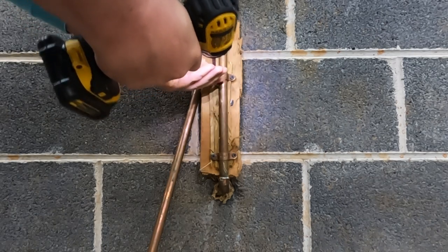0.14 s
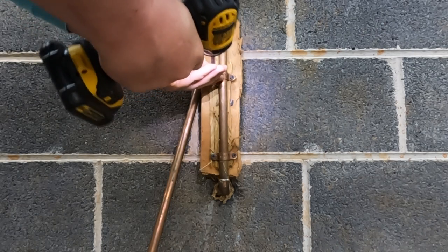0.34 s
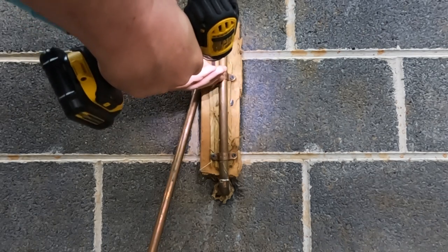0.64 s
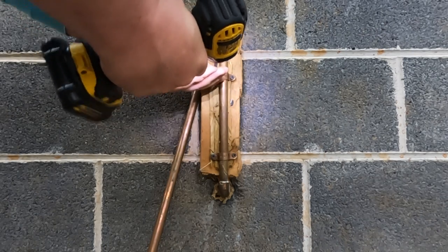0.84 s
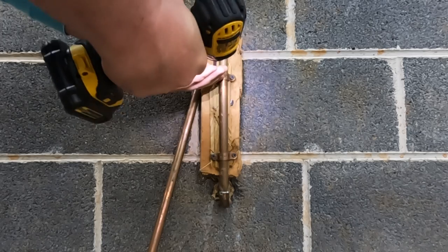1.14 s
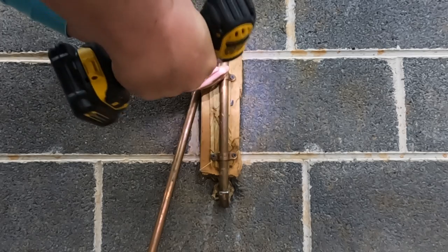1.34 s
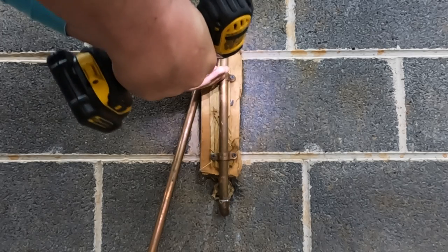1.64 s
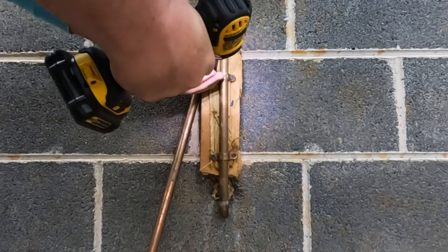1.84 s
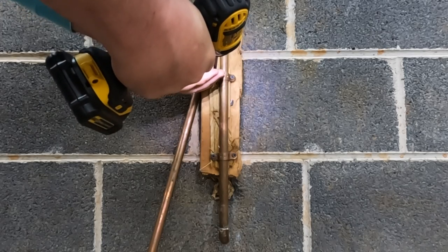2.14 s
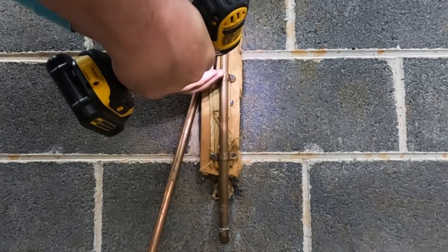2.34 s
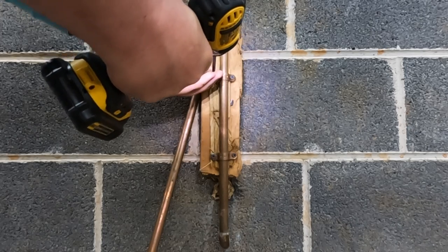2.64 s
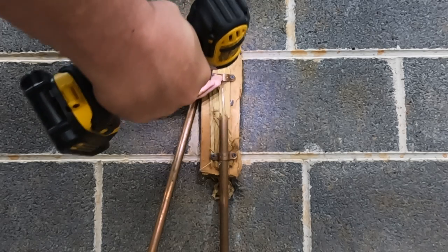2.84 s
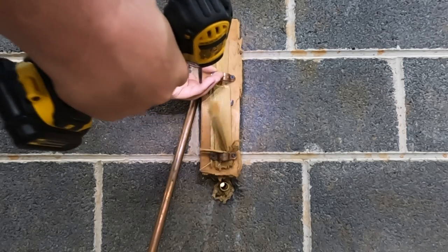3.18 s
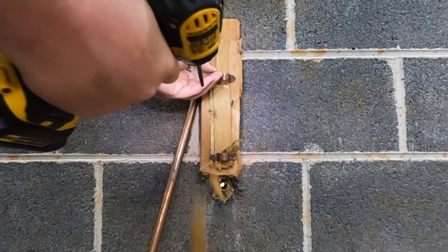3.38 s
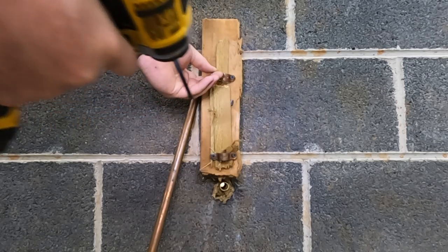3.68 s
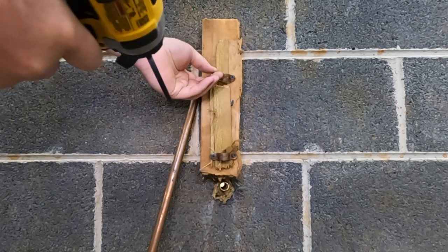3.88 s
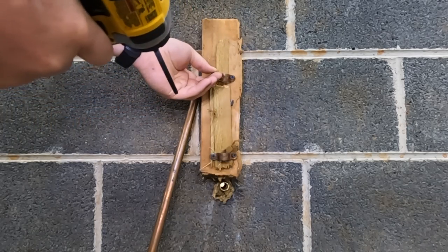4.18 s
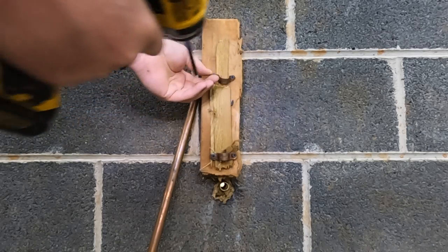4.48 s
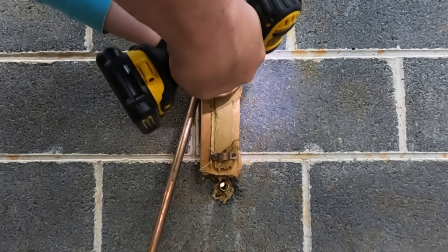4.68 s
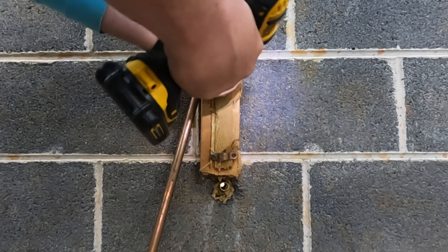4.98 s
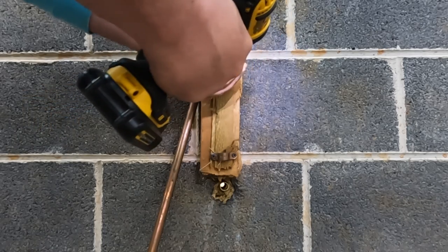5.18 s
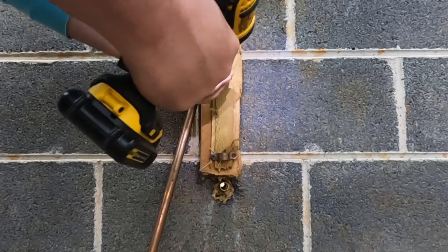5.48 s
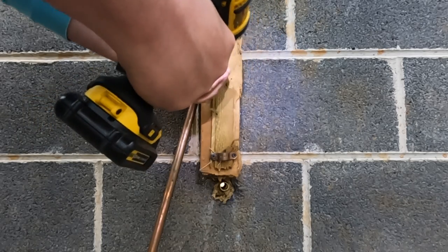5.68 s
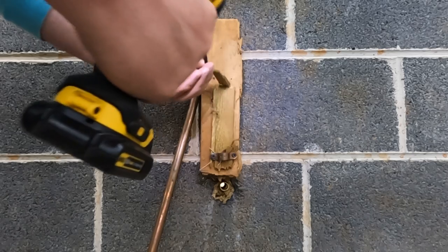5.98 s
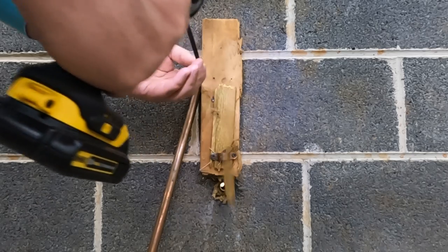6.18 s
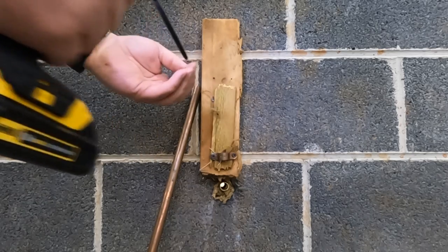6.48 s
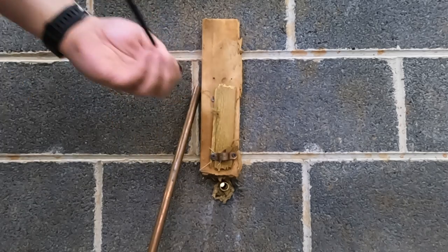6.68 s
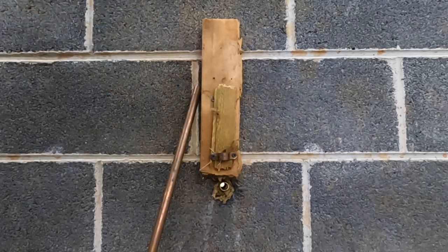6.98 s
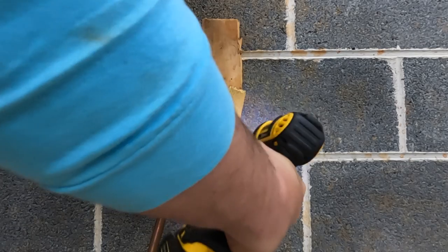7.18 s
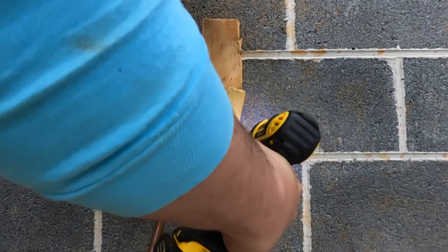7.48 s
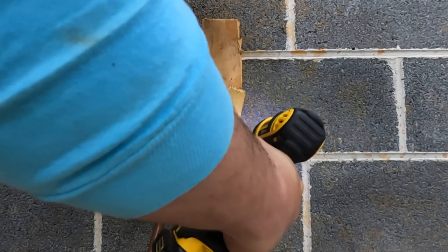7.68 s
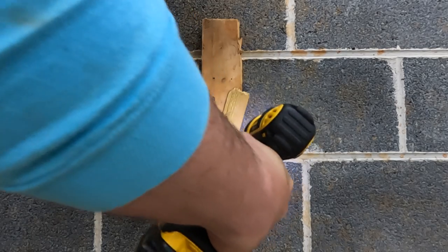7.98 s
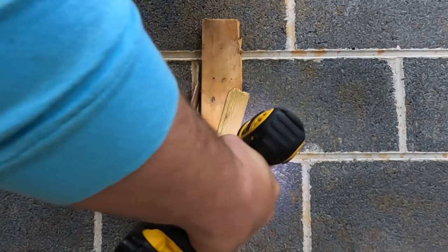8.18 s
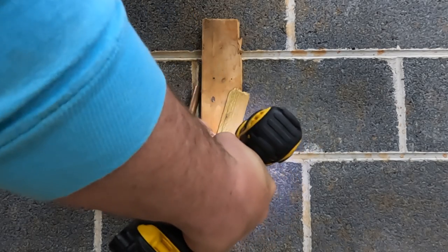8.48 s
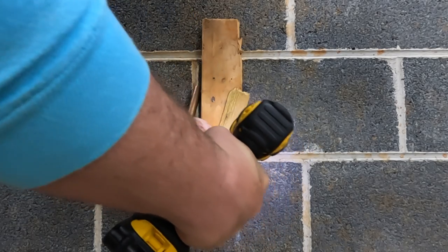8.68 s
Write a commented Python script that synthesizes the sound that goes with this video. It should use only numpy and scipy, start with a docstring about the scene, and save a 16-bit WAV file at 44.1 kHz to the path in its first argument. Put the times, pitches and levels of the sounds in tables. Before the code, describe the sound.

A cordless driver whirrs in short bursts and rattles screws loose, then a copper pipe drops and rings on concrete in a rumbling basement.

```python
"""Cordless driver and falling pipe

A cordless driver backs screws out of a wooden batten on a basement block wall in short pulls of the trigger:
throbbing noise, tooth whine, squeals and knocks. A freed length of copper pipe scrapes out, drops and bounces
ringing on the concrete, its paired modes beating; small parts click in the hand as resonant bursts.
Shaped noise and a wavering sine make a boiler-like rumble with a mains hum under everything."""
import sys
import numpy as np
from scipy import signal
from scipy.fft import rfft, irfft, next_fast_len
from scipy.io import wavfile
from scipy.ndimage import uniform_filter1d

SR = 44100
rng = np.random.default_rng(int(sys.argv[2]) if len(sys.argv) > 2 else 0)


def store_wav(level_fs):
    """Save 16-bit WAV to argv[1]."""
    pcm = np.round(np.clip(np.atleast_2d(level_fs), -1, 1) * 32767)
    wavfile.write(sys.argv[1], SR, pcm.T.astype(np.int16))


N = 389403   # samples

# Levels in the tables are relative: each layer is trimmed again where it is mixed.

# Rumble level over time, sinking from 3.2 s to 4.5 s and jumping back at 4.55 s: [t/s, level/dB]
RUMBLE_LEVEL = [
    [(0.0, -39), (.67, -37), (1.3, -41), (1.75, -38), (3.15, -34.5), (3.85, -43), (4.39, -44.5),
     (4.535, -42), (4.555, -35), (7.3, -34), (7.55, -39.5), (7.9, -36), (8.83, -34)],
]
# Spectrum of the rumble noise: [f/Hz, level/dB per Hz]
RUMBLE_SPECTRUM = [(12, -37.5), (20, -8.5), (48, -10.5), (65, -3), (87, -9), (144, -17.5), (172, -27.5),
                   (236, -29.5), (352, -33), (440, -40), (476, -35.5), (524, -39.5), (900, -63.5),
                   (1170, -91.5), (1980, -120)]
# Spectrum of the thin air noise: [f/Hz, level/dB per Hz]
AIR_SPECTRUM = [(410, -38), (700, -5.5), (1260, 0), (1330, -1), (1450, -3), (2030, -10.5), (2370, -10),
                (3350, -16.5), (6430, -15), (10300, -31.5), (15000, -34.5)]
# Time the room takes to die away by 60 dB: [f/Hz, t60/s]
ROOM_T60 = [(100, 0.69), (1000, 0.46), (4000, 0.37), (8000, 0.19), (14000, 0.45)]
# Treble tilt of the work, given in part to each ear: [f/Hz, level/dB]
EAR_TILT = [(60, 3), (180, 1.5), (550, -2.5), (1650, -4.5), (4970, -3), (15000, 11)]
# Skin and sleeve rustling faintly: [loudest t/s, level/dB, swells 20 dB in t/s, fades 20 dB in t/s]
RUSTLES = [(2.006, -55, .1, .1), (2.294, -76, .15, .25), (5.04, -57, .01, .03), (5.15, -68, .2, .15),
           (5.246, -59, .02, .04), (5.416, -58.5, .14, .11), (5.69, -69, .15, .2), (6.018, -61.5, .11, .16),
           (6.332, -62, .015, .015), (6.52, -56, .02, .15), (6.692, -52, .015, .09), (6.804, -56, .01, .25),
           (8.288, -52, .06, .05), (8.68, -68, .08, .15)]
# Trigger, bit and screws clicking: [t/s, level/dB, ring f/Hz, bright edge level/dB, woody body level/dB]
CLICKS = [(0.181, -37, 3350, -27, -4), (0.216, -33.5, 2660, -31, 1), (0.4294, -43.5, 5450, 5, -12),
          (0.6419, -34, 2230, -30, -14), (0.789, -43, 2640, -32, 1.5), (1.2535, -31.5, 5330, -37, -16.5),
          (1.319, -47, 2670, -28, -4), (1.3839, -33.5, 5160, -13.5, -7), (1.792, -40, 2590, -28, -17),
          (4.4983, -39, 2960, -51, -27), (4.5989, -35, 2650, -44, -3), (4.6124, -44, 2760, -20, -10),
          (4.6776, -31, 3940, -32, -26), (4.9284, -29, 5220, -18, -13.5), (5.0404, -25, 7180, -27, -38),
          (5.0654, -41.5, 3950, -24, -7.5), (5.0956, -32, 3930, -30, -12.5), (5.1079, -26, 3040, -28, -21),
          (5.149, -28, 3060, -21, -17), (5.1791, -41, 3690, -18, -6), (5.208, -30, 3700, -11, -19),
          (5.2244, -39, 4610, -17, -8), (5.2455, -27, 4750, -21.5, -18), (5.9479, -44, 4410, -4, -13),
          (5.9858, -38.5, 4520, -6, -20.5), (6.007, -45, 4500, 0.5, -18.5), (6.0267, -40, 4440, -4, -23.5),
          (6.0644, -49, 4440, -12, -12), (6.1404, -39.5, 3800, 0, -29), (6.332, -44.5, 2730, -22, -12.5),
          (6.4736, -8.5, 4620, -27, -17), (6.4994, -8, 4520, -12.5, -12.5), (6.619, -27, 4470, -12, -22),
          (6.695, -21, 6500, -16, -20), (6.7387, -30, 4700, 0, -17), (6.804, -22.5, 6450, -6.5, -27),
          (6.9438, -24.5, 4420, -11.5, -14), (7.0485, -36.5, 2290, -25, -9),
          (7.1204, -39, 2230, -24.5, -15.5), (7.1478, -64, 2720, 3.5, 9), (7.1808, -21, 4210, -14, -8),
          (7.5353, -32, 2500, -36, -7), (7.5854, -30.5, 2670, -29, -7), (7.6113, -9, 4300, -32, -14.5),
          (7.8449, -30, 2570, -33, -10), (7.8958, -41, 3710, -27, -4), (8.2516, -30.5, 2480, -31, -12),
          (8.2641, -33.5, 5950, -32, -11), (8.317, -16, 3930, -15, -30), (8.4442, -6.5, 5800, -15, -25.5),
          (8.5344, -19.5, 4475, -23, -21.5), (8.7869, -43.5, 2240, -24, -9)]
# Ringing modes of a screw: [f/Hz, level/dB, t60/s]
SCREW_MODES = [(3680, -11, 0.047), (4430, -14, .2), (4460, -7, .15), (6120, -5, 0.055), (7400, -7, .06),
               (10200, -9.5, .08)]
# Pipe scraping along its clips, one list per scrape: [t/s, rasp level/dB, fine hiss level/dB]
SCRAPES = [
    [(1.9, -83, -81), (1.945, -50, -57), (2.004, -49, -51.5), (2.042, -44, -64), (2.07, -66, -73),
     (2.12, -76.5, -78.5)],
    [(2.63, -64, -79), (2.672, -56, -76), (2.678, -45, -77), (2.72, -55, -70), (2.76, -41, -57),
     (2.91, -42, -48), (2.924, -31, -47), (2.94, -39, -49), (2.952, -30, -48), (2.975, -38, -46),
     (3.022, -28, -40), (3.076, -45, -43.5), (3.128, -37, -34), (3.14, -43, -41), (3.19, -50, -48),
     (3.26, -51.5, -55)],
]
# Resonances of clips and batten: [f/Hz, width f/Hz, level/dB]
RASP_BANDS = [(1420, 300, 3.5), (2300, 300, 1), (2830, 170, 0), (300, 470, -0.5)]
# Spectrum of the fine hiss: [f/Hz, level/dB per Hz]
HISS_SPECTRUM = [(1940, -26.5), (3300, -6.5), (3920, -8.5), (5440, -10.5), (6790, -0.5), (8980, -11.5),
                 (10800, -9), (13200, -13.5), (15000, -36)]
# Pipe meeting wall and floor; the 24 Hz thud at 3.696 s is a sub-bass jolt apart from the pipe:
# [t/s, crack level/dB, thud level/dB, thud f/Hz, thud t60/s]
BOUNCES = [(3.103, -25, -32, 120, 0.11), (3.123, -7, -30, 122, 0.089), (3.287, 1.5, -5.5, 108, 0.04),
           (3.489, -8.5, -24, 158, 0.063), (3.613, -22.5, -40, 100, 0.093), (3.696, -9, -10.5, 24, 0.23),
           (3.71, -10.5, -8, 177, 0.023), (3.909, -18, -21, 60, 0.038), (4.021, -17, -46, 90, .08),
           (4.098, -24, -40.5, 90, .08)]
# Pipe modes, balanced within each family: [f/Hz, level/dB]
PIPE_MODES = [(436.0, -31), (1222, -31), (1270, -42), (2326, -27), (2724, -42), (3472, -34), (4027, -34),
              (4296, -37), (5190, -41), (5480, -35), (6040, -40), (6218, -51), (6395, -51), (6616, -50),
              (6697, -47), (7144, -49), (7424, -45), (7752, -51), (8457, -56), (8839, -56), (9205, -65),
              (9415, -52), (9631, -53), (10347, -50), (10664, -59), (11063, -61), (11590, -67),
              (12748, -59), (13657, -66), (14137, -75)]
# Harder landings set the modes ringing afresh: [t/s, beats of the lowest mode/per s as the pipe turns over,
# their phase at the landing/rad, pace of the beating above it/ratio, then level/dB of each family in turn]
LANDINGS = [(3.123, 5.1, .1, 1.01, -60, -61, -46, -65, -48, -51, -50, -47, -61),
            (3.287, 5.5, -.2, 1.03, -29, -38, -21, -47, -26, -34, -20, -39, -41),
            (3.489, 4.1, 1.1, .85, -32, -29, -23, -45, -23, -23, -23, -35, -40),
            (3.613, 2.1, 1.9, .7, -32, -22, -20, -46, -33, -22, -35, -45, -54),
            (3.696, 2.1, 2.6, .97, -28, -36, -21, -41, -32, -27, -28, -27, -28),
            (3.909, 2.1, -3.1, 1.1, -25, -42, -33, -36, -37, -24, -23, -27, -38),
            (4.021, 6.1, -1.4, .8, -31, -41, -31, -34, -40, -29, -26, -30, -35)]
# Mode families; the tube is not quite round, so each mode has a twin: [top f/Hz, decay/dB per s,
# extra decay when rolling/dB per s, beats/per s, twin share/ratio, twin phase at the landing/rad]
FAMILIES = [(600, 5, 40, 0, .45, 0), (1500, 5, 12, 4.1, .3, -2.1), (2500, 22, 35, 14, .45, 2.1),
            (3000, 5, 100, 9.1, .4, -2.1), (3800, 60, 90, 8.1, .35, .3), (4800, 35, 130, 13, .5, -1.5),
            (5800, 60, 50, 9.1, .55, .3), (8000, 45, 60, 8.1, .55, -.5), (16000, 90, 90, 8.1, .55, -.5)]
# Pipe chattering on the concrete: [t/s, depth/0-1]
CHATTER = [
    [(3.29, .03), (3.69, .03), (3.7, .3), (3.73, .04), (3.9, .06), (4.02, .12), (4.1, .22), (4.22, .18),
     (4.5, .05)],
]
# Tight screws squealing as they break loose: [start t/s, end t/s, from f/Hz, to f/Hz, level/dB]
SQUEALS = [(0.863, 0.88, 2745, 3245, -12.5), (.864, .875, 4030, 4120, -14), (.865, .876, 1080, 1050, -23.5),
           (.878, 0.882, 1870, 2270, -13.5), (0.88, 0.895, 2890, 4130, -13),
           (7.199, 7.213, 1102, 1700, -20.5), (7.2, 7.228, 4090, 4790, -11),
           (7.209, 7.229, 2300, 2530, -12.5), (7.228, 7.249, 4500, 4490, -17),
           (5.55, 5.68, 2900, 2600, -68), (7.229, 7.243, 2900, 3380, -15.5)]
# Hammer blows of the driver: [t/s, steel level/dB, ring f/Hz, thud level/dB]
BLOWS = [(0.931, -11.5, 1380, -28), (0.951, -11.5, 2970, -22.5), (0.959, -11, 2980, -15.5),
         (0.983, -5.5, 3110, -17.5), (1.009, -11, 1096, -22), (7.299, -9, 1490, -22),
         (7.31, -11, 1660, -14), (7.321, -9, 2510, -14), (7.334, -13, 2610, -14)]
# Trigger pulls: [squeezed t/s, let go t/s, tooth rate it climbs towards f/Hz, motor level/dB,
# whine level/dB, housing rattle level/dB, batten jolt level/dB, jolt lasts t/s]
PULLS = [(-.15, .005, 2000, -31, -60, -36, -40, .02), (.228, .342, 2250, -21, -25, -27, -27, .01),
         (.858, .882, 1900, -15, -45, -30, -38, .01), (.885, .99, 1800, -26, -45, -38, -28, .07),
         (1.394, 1.52, 2050, -21.5, -25, -20, -41, .03), (4.672, 4.817, 1750, -21.5, -24, -21, -42, .03),
         (7.18, 7.212, 1800, -15, -55, -28, -46, .01), (7.23, 7.335, 1800, -21, -55, -34, -25, .07),
         (7.602, 7.692, 1850, -21.5, -26, -29, -31, .05), (7.907, 8.003, 2100, -21.5, -25, -23, -42, .03),
         (8.313, 8.44, 2100, -19.5, -24, -24, -44, .02)]
# Spectrum of brush and gear noise: [f/Hz, level/dB per Hz]
MOTOR_SPECTRUM = [(180, -58.5), (300, -19.5), (509, -13.5), (1110, -7), (1220, -5.5), (1420, -4.5),
                  (2250, -5.5), (2610, -2), (3570, -5), (5130, -3), (7500, -10.5), (11900, -24.5),
                  (15500, -39.5)]
# Housing resonances lifting the whine overtones: [f/Hz, width f/Hz, level/dB]
HOUSING_BANDS = [(2600, 600, -1.5), (5300, 450, -3.5)]

AIR_DB, AIR_FOLLOWS = -65.5, .9   # base level at the loudest rumble; share of the rumble's sag
# The far room lingers after loud work: dB against the work, time constant of the power in s
MID_LINGER_DB, MID_LINGER_S = -28, .06
TREBLE_LINGER_DB, TREBLE_LINGER_S = -32, .035
CONTACT_S = .005   # a landing lasts
ROLLS_S = 4.1   # the pipe stops bouncing
FADE_FROM_S, FADE_DB_PER_S2, FADE_MOST_DB = 4.29, 5000, 44   # the ring is faded out ever faster
SPIN_UP_S, BRAKE_HZ_PER_S = .04, 29000
MOTOR_SLOPE, RATTLE_SLOPE = .85, 1.3   # dB of level per dB of speed
COAST_S, MOTOR_FALL_DB_PER_S, RATTLE_FALL_DB_PER_S = .008, 420, 480   # after the trigger is let go
JOLT_RISE_DB_PER_S, JOLT_FALL_DB_PER_S = 300, 190   # the brake kicks the batten
LIGHT_LOAD_DB, BRAKING_DB = -11.5, -1.5   # the teeth sing less at full speed, when torque is low
WHINE_SLOPE, WHINE_KNEE_HZ = 4.5, 1000   # the small housing radiates little below the knee
CUTOFF_HZ = 15700


def amp(db):
    """Gain of a level in dB."""
    return 10 ** (np.asarray(db) / 20)


def unit(x):
    """Scale to rms 1."""
    return x / np.sqrt(np.mean(x ** 2) + 1e-20)


def noise():
    """White noise over the whole scene."""
    return rng.standard_normal(N)


def in_time(tables, rest=-120, hold=False):
    """Draw the columns of several curves on the sample grid; between them at rest, or held."""
    t = np.arange(N) / SR
    out = np.full((len(tables[0][0]) - 1, N), float(rest))
    for rows in tables:
        s, *columns = np.transpose(rows)
        on = (t >= s[0]) & (hold | (t <= s[-1]))
        out[:, on] = [np.interp(t[on], s, column) for column in columns]
    return out


def on_samples(coarse):
    """Bring rows given every millisecond onto the sample grid."""
    t = np.arange(N) / SR
    return [np.interp(t, np.arange(len(row)) / 1000, row) for row in coarse]


def at_hz(points, hz):
    """Read a spectrum on a log frequency axis."""
    table = np.array(points)
    return np.interp(np.log(hz), np.log(table[:, 0]), table[:, 1])


def shaped(x, spectrum, share=1):
    """Filter x through a share of a spectrum in dB."""
    size = next_fast_len(N)
    hz = np.maximum(np.fft.rfftfreq(size, 1 / SR), 1)
    return irfft(rfft(x, size) * amp(share * at_hz(spectrum, hz)), size)[..., :N]


def coloured(x, spectrum):
    """Shape x by a spectrum and scale to rms 1."""
    return unit(shaped(x, spectrum))


def drift(rate_hz):
    """Slow random wander of rms 1: noise through two equal one-pole lowpasses."""
    r = np.exp(-2 * np.pi * rate_hz / SR)
    warm_up = SR // 4
    wander = signal.lfilter([1], [1, -2 * r, r * r], rng.standard_normal(N + warm_up))
    return unit(wander[warm_up:])


def ring(strikes, hz, t60):
    """Let each unit strike set a dying sine of height 1 ringing."""
    r, w = amp(-60 / (t60 * SR)), 2 * np.pi * hz / SR
    return signal.lfilter([0, np.sin(w)], [1, -2 * r * np.cos(w), r * r], strikes + 1e-18)


def resonance(x, hz, width_hz):
    """Pass a resonant band with gain 1 at its top."""
    r = np.exp(-np.pi * width_hz / SR)
    zeros = np.array([1, 0, -1]) * (1 - r * r) / 2
    return signal.lfilter(zeros, [1, -2 * r * np.cos(2 * np.pi * hz / SR), r * r], x)


def knock(hz, t60, width_hz):
    """A blow and a dying burst of noise through one resonance; peak 1."""
    t = np.arange(round(.1 * SR)) / SR
    burst = 0.39 * rng.standard_normal(len(t))
    burst[0] = 2.98
    dying = burst * amp(-60 * t / t60) + 1e-18
    x = resonance(resonance(dying, hz, width_hz), hz, 2 * width_hz)   # twice for steep skirts
    return x / np.max(np.abs(x))


def thud(hz, t60):
    """A soft low blow: one damped sine."""
    t = np.arange(round(.3 * SR)) / SR
    return np.sin(2 * np.pi * hz * t) * amp(-60 * t / t60)


def add(out, s, piece):
    """Mix a piece in at s seconds."""
    i = round(s * SR)
    out[i:i + len(piece)] += piece[:N - i]


def lingering(x, below_db, seconds):
    """Follow the running level of x and let it go slowly."""
    r = np.exp(-1 / (seconds * SR))
    return amp(below_db) * np.sqrt(signal.lfilter([1 - r], [1, -r], x ** 2 + 1e-18))


def background(work):
    """Low rumble with a wavering hum, nearly alike in both ears, and a thin wide air."""
    rumble_db, = in_time(RUMBLE_LEVEL, hold=True)
    mid, side, air_mid, air_side = rng.standard_normal((4, N))
    opposite = [[1], [-1]]   # left and right differ by the side signal
    hum = np.sin(2 * np.pi * 59.3 * np.arange(N) / SR) * amp(1.5 * drift(4.5))
    rumble = coloured(mid, RUMBLE_SPECTRUM) + amp(0.5) * hum
    rumble = rumble + amp(-32.5) * coloured(side, RUMBLE_SPECTRUM) * opposite
    air = coloured(air_mid, AIR_SPECTRUM) + amp(-6.5) * coloured(air_side, AIR_SPECTRUM) * opposite
    air_level = amp(AIR_DB + AIR_FOLLOWS * (rumble_db - rumble_db.max()))
    air_level = air_level + lingering(work, MID_LINGER_DB, MID_LINGER_S)
    return amp(rumble_db - 0.5) * rumble + air_level * amp(0.88 * drift(8)) * air


def basement(x, width_db=-3):
    """Hard walls: close early echoes, then noise dying away band by band, partly different in the two ears."""
    t = np.arange(round(.8 * SR)) / SR
    tail = amp(9) * np.diff(rng.standard_normal((2, len(t) + 1))) * amp(-60 * t / 0.059)
    for hz in 60 * 2 ** np.arange(0, 8.3, .5):
        mid, side = rng.standard_normal((2, len(t)))
        band = signal.butter(2, [hz / 2 ** .25, hz * 2 ** .25], "band", fs=SR, output="sos")
        late = signal.sosfilt(band, mid + amp(width_db) * side * [[1], [-1]])
        late = late * amp(-60 * t / at_hz(ROOM_T60, hz))
        tail = tail + late * np.clip(t / 0.018, 0, 1)
    response = tail / np.sqrt(np.sum(tail[0] ** 2))
    return signal.fftconvolve(x[None], response, axes=1)[:, :N]


def rustle(work):
    """Soft patchy friction noise in the treble; the same band lingers after loud work."""
    t = np.arange(0, N / SR + .001, .001)
    swells = np.zeros(len(t))
    for s, db, swell_s, fade_s in RUSTLES:
        below_peak = 20 * np.where(t < s, (s - t) / swell_s, (t - s) / fade_s)
        swells += amp(db - below_peak)
    level, = on_samples([swells])
    band = unit(resonance(resonance(noise(), 5400, 2500), 5600, 4000))
    return (level + lingering(work, TREBLE_LINGER_DB, TREBLE_LINGER_S)) * amp(2.5 * drift(25)) * band


def clicks():
    """Each tick has a plastic ring, a bright edge and a woody body; the brighter, the more the screw rings."""
    out, strikes = np.zeros(N), np.zeros(N)
    for s, db, hz, bright_db, body_db in CLICKS:
        plastic = amp(-6.5) * knock(hz, 0.014, 900)
        edge = amp(bright_db + 1) * knock(9000, 0.014, 3900)
        body = amp(body_db + 5.5) * knock(1200, 0.017, 1100)
        add(out, s, amp(db) * (plastic + edge + body))
        strikes[round(s * SR)] = amp(db + .6 * bright_db - 16)
    return out + sum(amp(db) * ring(strikes, hz, t60) for hz, db, t60 in SCREW_MODES)


def scrape():
    """Uneven grains: coarse ones through clips and batten, fine ones as hiss and through the pipe modes."""
    grain_db = 2.5 * np.minimum(rng.exponential(1, (2, N)), 4)
    grains = amp(grain_db) * rng.standard_normal((2, N))
    grains_per_s = np.array([[2500], [9000]])
    coarse, fine = grains * (rng.random((2, N)) < grains_per_s / SR)
    rasp_db, hiss_db = in_time(SCRAPES)
    rasp = unit(sum(amp(db) * resonance(coarse, hz, width_hz) for hz, width_hz, db in RASP_BANDS))
    hiss = coloured(fine, HISS_SPECTRUM) * amp(hiss_db + 0.83 * drift(40))
    modes, until = np.zeros(N), round(3.5 * SR)
    for hz, db in PIPE_MODES:
        if hz > 2000:
            modes[:until] += amp(0.11 * (db + 40)) * ring(hiss[:until], hz, 0.089)
    return amp(rasp_db - 1.0 + 2.5 * drift(40)) * rasp + amp(-3) * hiss + amp(-34.5) * modes


def over_contact(x):
    """Spread sudden changes over the short time a landing lasts."""
    return uniform_filter1d(x, size=round(CONTACT_S * SR), origin=round(CONTACT_S * SR / 2) - 1)


def pipe_ringing():
    """Each landing deals new strengths to the pipe's modes, which come in close beating pairs."""
    ringing = np.zeros(N)
    on = slice(round(3.12 * SR), round(4.55 * SR))
    t = (np.arange(N) / SR)[on]
    at, low_beats, low_start, pace, *family_db = np.transpose(LANDINGS)
    top_hz, decay, rolling_decay, *_ = np.transpose(FAMILIES)
    last = np.maximum(np.searchsorted(at, t) - 1, 0)   # the latest landing
    since = t - at[last]
    families = np.zeros((len(FAMILIES), len(t)))
    power = np.zeros_like(families)
    for hz, db in PIPE_MODES:
        k = np.searchsorted(top_hz, hz)
        beats, share, start = FAMILIES[k][3:]
        luck_db, slip = rng.normal(0, 3.5, len(at)), rng.normal(0, .3, len(at))
        sway_db = np.interp(t, np.linspace(t[0], t[-1], 40), rng.normal(0, 4.5, 40))   # turning in the air
        # only the upper families vary by chance
        height = over_contact(amp(db + luck_db[last] * (k > 5) + sway_db * (k > 4)))
        phase = 2 * np.pi * hz * t + rng.uniform(0, 2 * np.pi)
        if k == 0:
            ahead = low_start[last] + 2 * np.pi * low_beats[last] * since   # phase lead of the twin
        else:
            ahead = start + 2 * np.pi * beats * (pace + slip * (k > 4))[last] * since
        in_step = over_contact(1 + share * np.cos(ahead)) * np.sin(phase)
        out_of_step = over_contact(share * np.sin(ahead)) * np.cos(phase)
        families[k] += height * (in_step + out_of_step)
        power[k] += height ** 2 / 2
    families[5:] *= 1 + (in_time(CHATTER, rest=0)[0] * drift(350))[on]   # chatter roughens the upper modes
    fade_db = np.minimum(FADE_DB_PER_S2 * np.maximum(t - FADE_FROM_S, 0) ** 2, FADE_MOST_DB)
    level_db = np.array(family_db)[:, last] - np.outer(decay, since) - fade_db
    level_db -= np.outer(rolling_decay, np.maximum(t - ROLLS_S, 0))
    ringing[on] = np.sum(over_contact(amp(level_db)) * families / np.sqrt(power), axis=0)
    return ringing


def pipe_hits():
    """Hard cracks of resonant noise with damped low thuds, one of them a sub-bass jolt apart from the pipe."""
    out = np.zeros(N)
    for s, db, thud_db, thud_hz, thud_t60 in BOUNCES:
        crack = amp(2.5) * knock(3200, 0.012, 2500)
        crack = crack + amp(-10) * knock(7000, .012, 5500) + amp(-16) * knock(850, 0.064, 650)
        add(out, s, amp(db) * crack)
        add(out, s, amp(thud_db) * thud(thud_hz, thud_t60))
    return out


def screws():
    """Stick-slip squeals as gliding, jittering tones, and the blows of the hammer as steel over a thud."""
    out = np.zeros(N)
    for start, end, from_hz, to_hz, db in SQUEALS:
        count = round((end - start) * SR)
        wobble = 1 + 0.38 * uniform_filter1d(rng.standard_normal(count), size=60)
        phase = 2 * np.pi * np.cumsum(np.linspace(from_hz, to_hz, count) * wobble) / SR
        squeal = np.sin(phase) + amp(-18) * np.sin(2 * phase) + amp(-15.5) * np.sin(3 * phase)
        add(out, start, amp(db) * squeal * np.hanning(count) ** 0.12)
    for s, db, hz, thud_db in BLOWS:
        steel = amp(2.0) * knock(hz, .02, 1100) + amp(-3) * knock(4000, .02, 4600)
        low = knock(110, 0.058, 70) + amp(-7.5) * knock(500, 0.07, 400)
        add(out, s, amp(db) * steel + amp(thud_db) * low)
    return out


def trigger(t):
    """Tooth rate, then levels of motor, whine, rattle and jolt; the loudest pull leads each level."""
    tooth_hz, levels = np.zeros(len(t)), np.full((4, len(t)), -120.)
    for start, end, top_hz, motor_db, whine_db, rattle_db, jolt_db, jolt_s in PULLS:
        spun_hz = top_hz * (1 - np.exp(-(np.clip(t, start, end) - start) / SPIN_UP_S))
        spun_db = 20 * np.log10(spun_hz / top_hz + 1e-6)
        after = np.maximum(t - end - COAST_S, 0)
        hz = np.maximum(spun_hz - BRAKE_HZ_PER_S * np.maximum(t - end, 0), 0)
        tooth_hz[t >= start] = hz[t >= start]
        radiated_db = WHINE_SLOPE * 20 * np.log10(np.minimum(hz / WHINE_KNEE_HZ, 1) + 1e-6)
        load_db = LIGHT_LOAD_DB * (hz / top_hz) ** 2 + BRAKING_DB * (t > end)
        jolt_rise_db = JOLT_RISE_DB_PER_S * np.maximum(end - t, 0)
        jolt_fall_db = JOLT_FALL_DB_PER_S * np.maximum(t - end - jolt_s, 0)
        levels = np.maximum(levels, [
            motor_db + MOTOR_SLOPE * spun_db - MOTOR_FALL_DB_PER_S * after,
            whine_db + radiated_db + load_db,
            rattle_db + RATTLE_SLOPE * spun_db - RATTLE_FALL_DB_PER_S * after,
            jolt_db - jolt_rise_db - jolt_fall_db])
    return tooth_hz, *levels


def driver():
    """Brush and gear noise throbbing with the chuck, tooth whine, the housing rattling, the batten shaking."""
    pulls = trigger(np.arange(0, N / SR + .001, .001))
    tooth_hz, motor_db, whine_db, rattle_db, shake_db = on_samples(pulls)
    throb = amp(1.9 * drift(90))
    brushes = coloured(noise(), MOTOR_SPECTRUM) * throb * amp(0.67 * drift(400))
    phase = 2 * np.pi * np.cumsum(tooth_hz * (1 + .024 * drift(150))) / SR
    overtones = np.sin(2 * phase) + amp(-1.5) * np.sin(3 * phase)
    whine = np.sin(phase)
    for hz, width_hz, db in HOUSING_BANDS:
        whine = whine + amp(db) * resonance(overtones, hz, width_hz)
    rattle = unit(resonance(noise(), 5350, 500)) * throb * amp(3.7 * drift(90))
    shake = unit(resonance(resonance(noise(), 135, 110), 135, 170))
    shake = shake + amp(-10) * unit(resonance(noise(), 450, 350))
    motor = amp(motor_db - 1.0) * unit(brushes) + amp(whine_db + 3.5 * drift(70)) * whine
    return motor + amp(rattle_db - 6.5) * rattle + amp(shake_db - 3.0) * shake


def scene():
    """Work at the wall, brighter on the left, the pipe on the floor, and the room around them."""
    hits, ringing = pipe_hits(), pipe_ringing()
    work = driver() + screws() + clicks() + scrape()
    work = work + rustle(work)
    direct = np.array([shaped(work, EAR_TILT, share=.5), shaped(work, EAR_TILT, share=0.17)])
    direct[0] = signal.lfilter([.45, .55], [1], direct[0])   # the left ear is a little farther away
    falling = (hits + amp(.8) * ringing) * amp([[.4], [-.4]])
    wet = amp(-7.5) * basement(work + amp(-4) * ringing + amp(-12.5) * hits)
    return direct + falling + wet + background(work + hits)


def record(dry):
    """Peaks are rounded, the highest treble is weak and the top is cut."""
    rounded = 0.91 * np.tanh(dry)
    soft = signal.sosfilt(signal.butter(2, 13000, fs=SR, output="sos"), rounded)
    return signal.sosfilt(signal.cheby2(12, 60, CUTOFF_HZ, fs=SR, output="sos"), soft)


dry = scene()
out = record(dry)
store_wav(out)
```